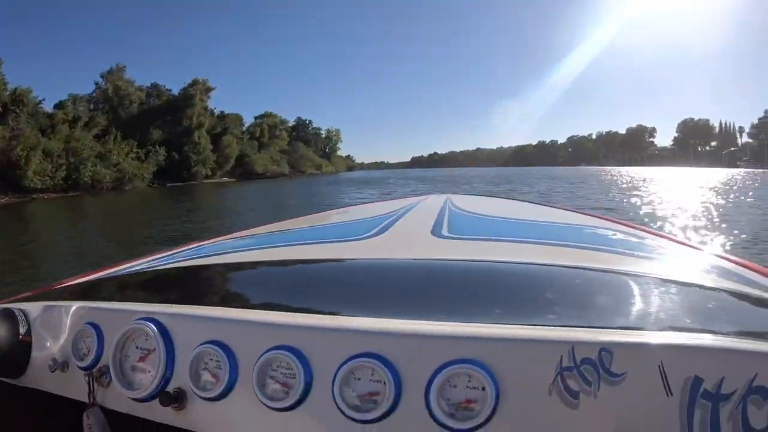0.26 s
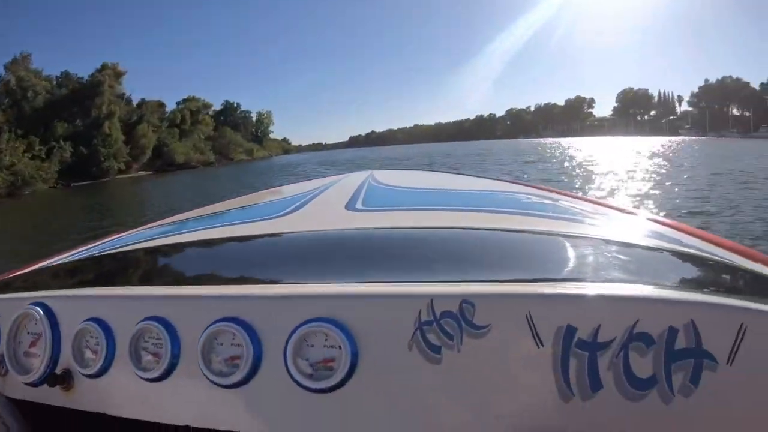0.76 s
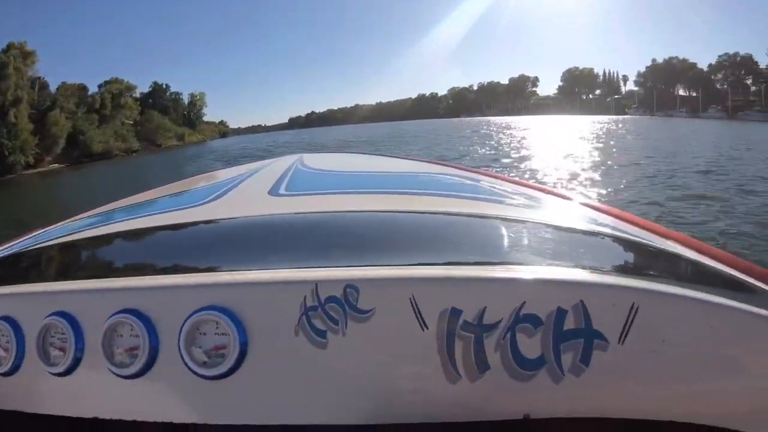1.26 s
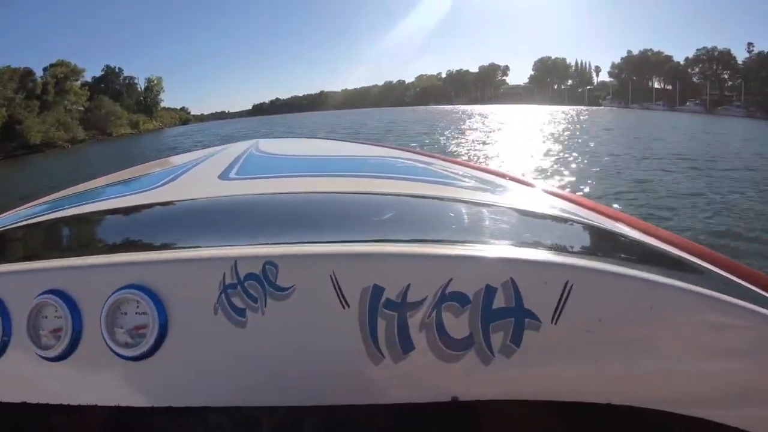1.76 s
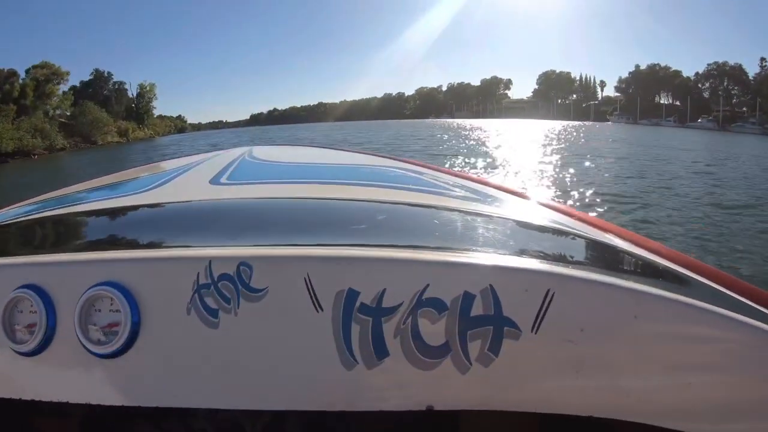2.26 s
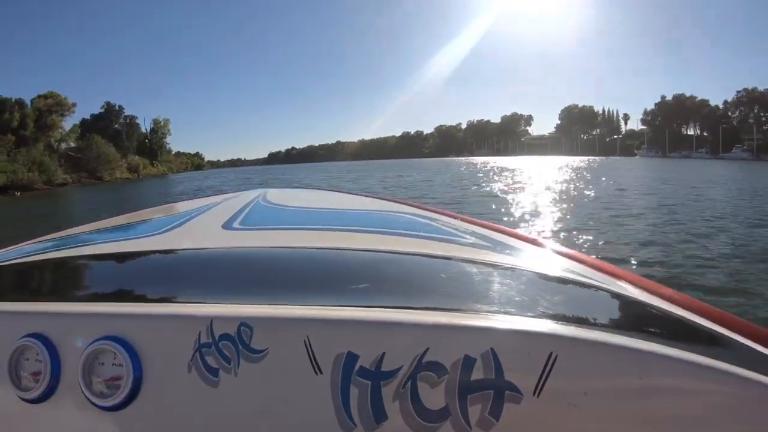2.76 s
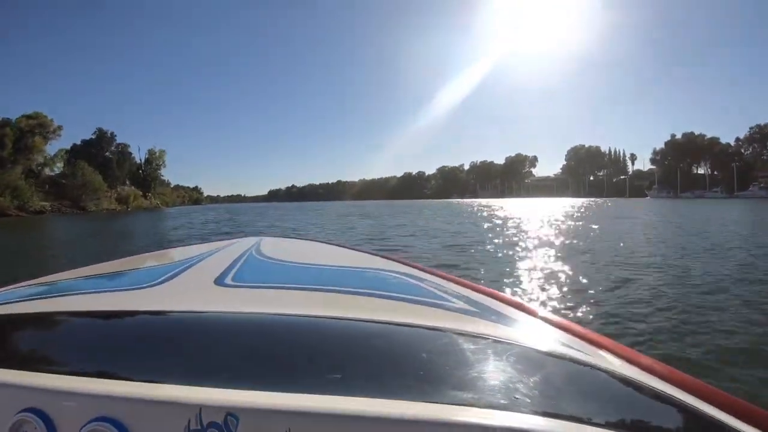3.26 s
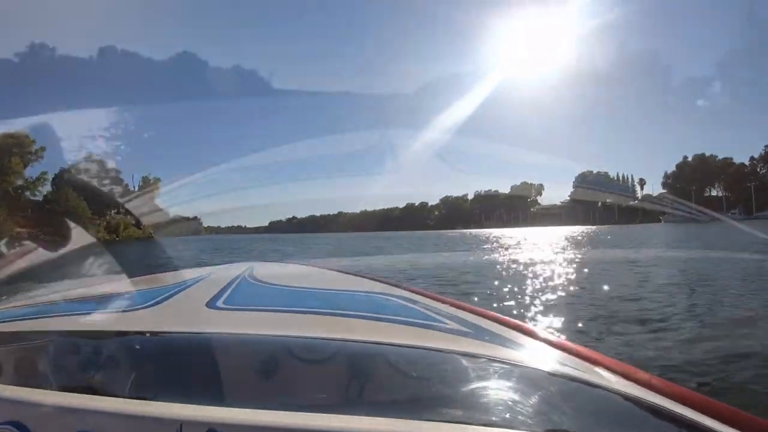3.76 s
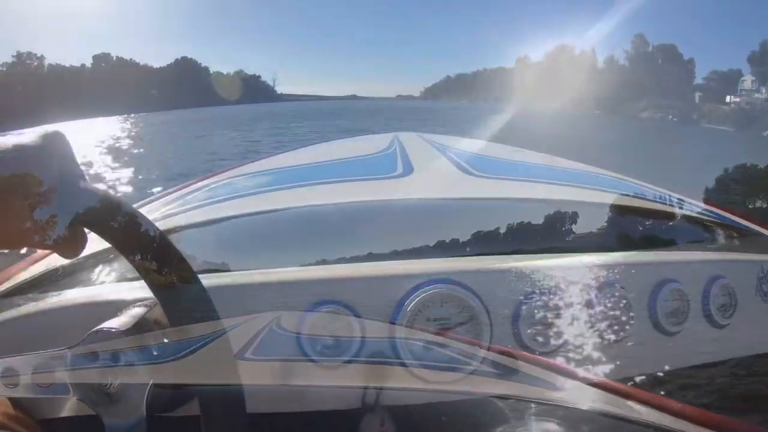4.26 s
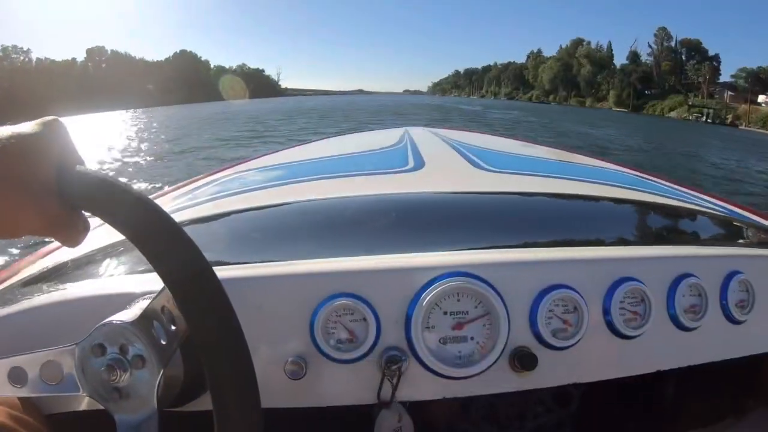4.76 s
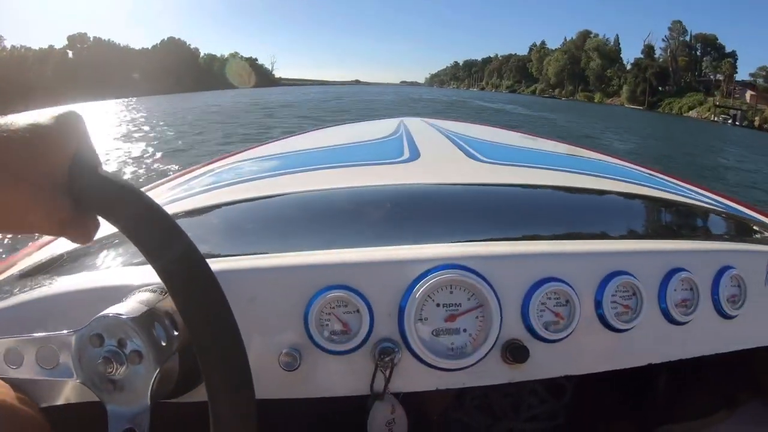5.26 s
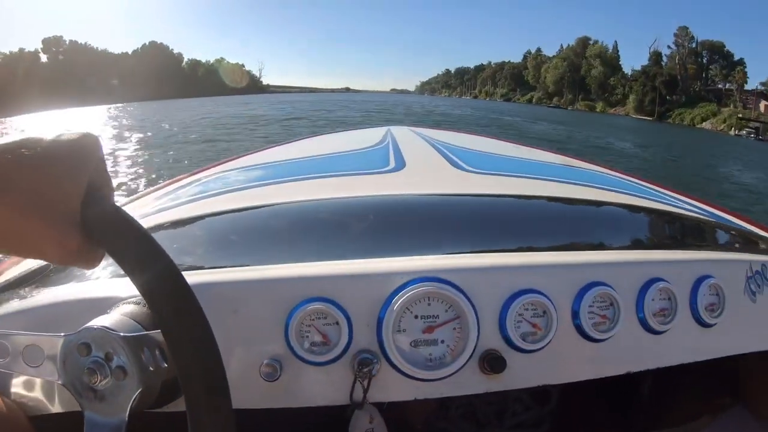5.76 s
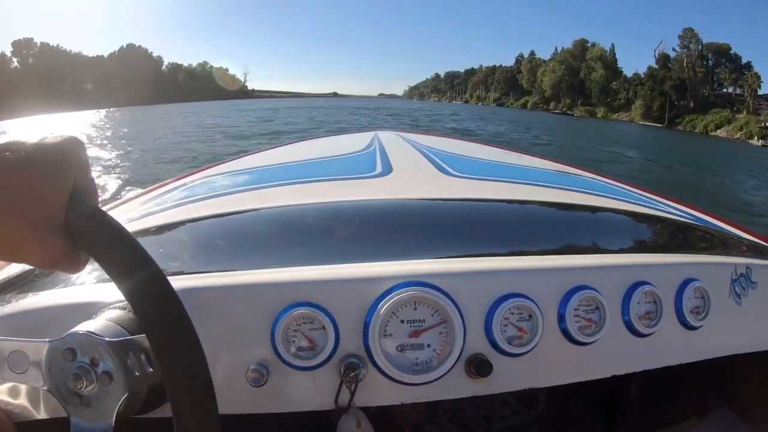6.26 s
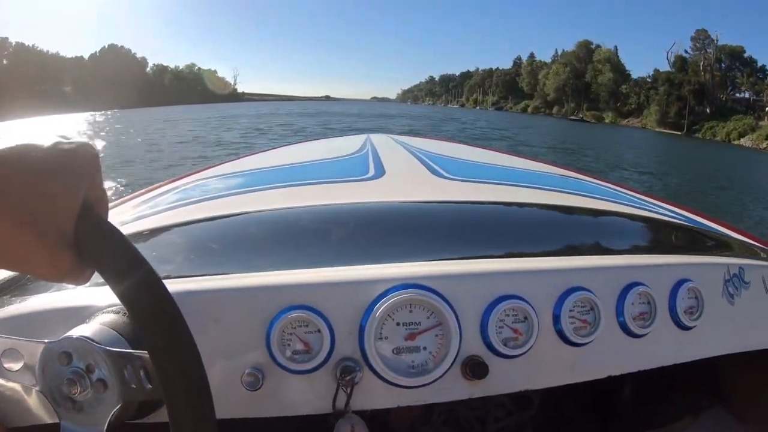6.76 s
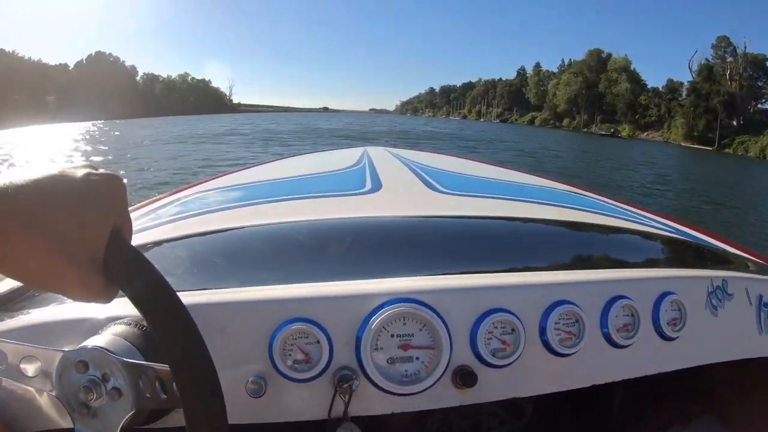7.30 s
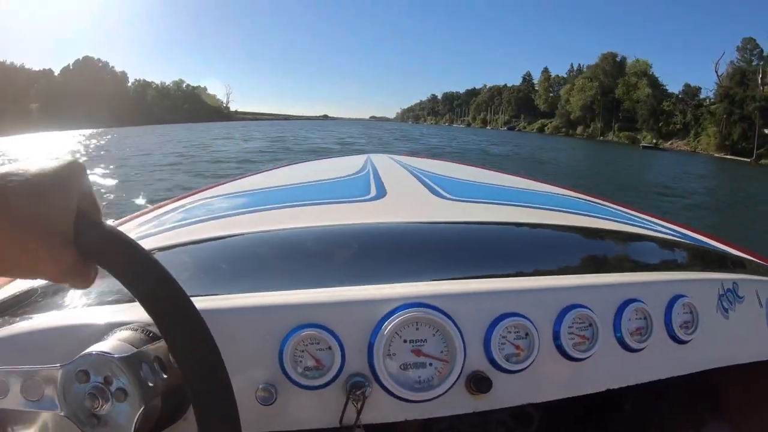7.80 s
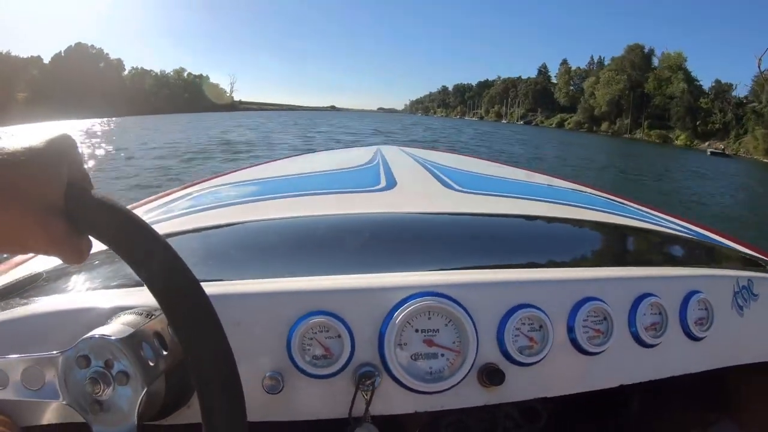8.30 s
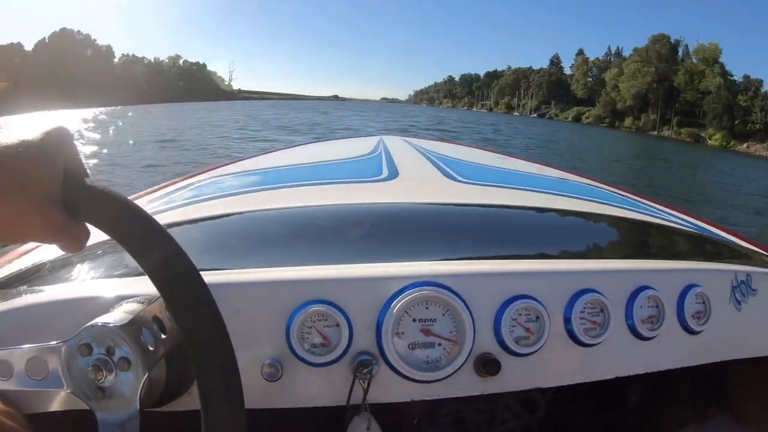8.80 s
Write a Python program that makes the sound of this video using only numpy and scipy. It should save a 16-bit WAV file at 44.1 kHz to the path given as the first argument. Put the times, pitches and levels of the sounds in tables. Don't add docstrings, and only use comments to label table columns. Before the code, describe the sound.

From an open boat cockpit, a deep V8 drone with water roar and hull slaps dissolves into a louder cruise, then the throttle opens.

```python
import sys
import numpy as np
from scipy import signal
from scipy.fft import rfft, irfft, next_fast_len
from scipy.io import wavfile
from scipy.ndimage import uniform_filter1d

SR = 44100
rng = np.random.default_rng(int(sys.argv[2]) if len(sys.argv) > 2 else 0)


def makeup_ratio(level_db):
    decades = np.asarray(level_db, float) / 20
    return 10 ** decades


def unload_audio(sound):
    columns = np.transpose(np.atleast_2d(sound))
    steps = np.round(np.clip(columns, -1, 1) * 32767)
    wavfile.write(sys.argv[1], SR, steps.astype(np.int16))


N = 398663
TIME = np.arange(N) / SR

# [multiple of the engine cycle, slow_db, cruise_db, open_db]
ENGINE_ORDERS = [(2, -40, -22, -20), (3, -35, -25, -19), (4, -27, -36, -23), (5, -13, -43, -30),
                 (6, -35, -42, -30), (7, -47, -47, -35), (8, -36, -31, -19), (9, -46, -37, -32),
                 (10, -55, -47, -30), (11, -48, -28, -33), (12, -60, -51, -39), (13, -45, -30, -33),
                 (14, -39, -39, -36), (16, -56, -46, -38), (19, -60, -51, -32), (20, -61, -49, -42),
                 (21, -52, -58, -40), (22, -64, -57, -41), (23, -55, -50, -41), (24, -41, -45, -44),
                 (25, -54, -46, -49), (26, -50, -42, -43), (27, -57, -56, -38), (28, -51, -52, -45),
                 (29, -53, -46, -46), (30, -55, -58, -43), (33, -68, -56, -49), (37, -68, -60, -50),
                 (42, -55, -60, -56), (45, -54, -62, -58)]


def slow_engine():
    # [time_s, cycles_per_s]
    speed = [(0.0, 25.9), (0.09, 26.1), (1.61, 26.2), (2.04, 26.1), (3.98, 26.3), (4.6, 26.4)]
    # [time_s, level_db]
    boom = [(0.0, -11), (.36, -15), (1.3, -11.5), (1.95, -13), (2.18, -11), (2.43, -13), (2.9, -12),
            (3.7, -11.5), (4.3, -21.5), (4.6, -36)]
    turns = np.cumsum(columns(speed, TIME)[0]) / SR
    fade = 1 - dissolve(TIME)
    multiples, slow_db = np.transpose(ENGINE_ORDERS)[:2]
    levels_db = slow_db[:, None] + 0.5 + 20 * np.log10(fade + 1e-3)
    levels_db[np.round(multiples) == 5] = columns(boom, TIME)[0]

    beats_per_s, beat_peak_s, beat_depth = 1.95, 2.44, 0.68
    second_bank = np.exp(2j * np.pi * beats_per_s * (TIME - beat_peak_s))
    banks = abs(1 + beat_depth * (1 - turned_in()) * second_bank)
    settle_s, settle_rise_s, unsettled_db = 1.5, 0.58, -3.5
    firing_db = -34 + 20 * np.log10(banks) + unsettled_db * (1 - ramp(settle_s, settle_rise_s))
    levels_db[np.round(multiples) == 8] = firing_db + 10 * np.log10(fade + 1e-3)
    levels_db[multiples > 6] += 8.0 * turned_in()

    tones = orders(turns, levels_db, waver_db=2.0, slip=0.05) + fade * pump_whine(turns)
    return (tones + fade * valve_gear(turns)) * np.minimum(10 * fade, 1)


def pump_whine(turns):
    pump_order, pump_db = 52.65, -50
    level = makeup_ratio(pump_db + 2 * wander(4.0)[0])
    return level * np.cos(2 * np.pi * pump_order * turns + wander(6.0)[0])


def valve_gear(turns):
    # [place in the engine cycle 0-1, level_db]
    closings = [
        (.2, -5),
        (.31, 0),
        (.56, -4),
        (.81, -12),
        (.93, -3),
    ]
    # [pitch_hz, db_per_hz]
    tick_colour = [(2000, -60), (3800, -22), (4600, -4), (5300, 0), (6300, -6), (7200, -22), (9500, -70)]
    clicks = np.zeros(N)
    for place, db in closings:
        at = np.flatnonzero(np.diff(np.floor(turns - place))) + 1
        clicks[at] += makeup_ratio(db + 3.0 * rng.standard_normal(N // 1000)[:len(at)])
    t = np.arange(400) / SR
    decay_60db_s, rise_s = 0.008, 0.00065
    tick = makeup_ratio(-60 * t / decay_60db_s) * np.minimum(t / rise_s, 1)
    burst = signal.oaconvolve(clicks, tick)[:N]
    gear_db, swing_db, peak_s, period_s = -55, 3.5, 1, 2.05
    level_db = gear_db + swing_db * np.cos(2 * np.pi * (TIME - peak_s) / period_s)
    return makeup_ratio(level_db) * evened(coloured(burst * rng.standard_normal(N), tick_colour))


def fast_engine():
    # [time_s, cycles_per_s]
    speed = [(4.4, 29.4), (5.2, 29.6), (5.7, 29.5), (6.3, 29.65), (6.6, 29.55), (6.92, 29.8), (6.98, 30.5),
             (7.12, 34.0), (7.16, 34.6), (7.25, 35.1), (7.4, 36.7), (7.5, 37.15), (7.75, 36.9),
             (7.86, 36.45), (8.03, 36.9), (8.48, 37.1), (9.04, 36.9)]
    cruise_end_hz, full_open_hz = 29.8, 33.5
    hz = columns(speed, TIME)[0] + 0.04 * wander(5.73)[0]
    multiples, _, cruise_db, open_db = np.transpose(ENGINE_ORDERS)
    throttle = np.clip((hz - cruise_end_hz) / (full_open_hz - cruise_end_hz), 0, 1)

    push_s, rise_s, hold_s, release_s = 6.85, 0.26, 0.13, 0.18
    pushed = ramp(push_s, rise_s)
    straining = pushed - ramp(push_s + rise_s + hold_s, release_s)
    load_db, strain_db = -0.5, 2.0
    levels_db = np.outer(cruise_db, 1 - throttle) + np.outer(open_db, throttle)
    levels_db += load_db + strain_db * straining

    creep_s, creep_rise_s, from_db, to_db = 4.6, 2.0, -2.5, 3.0
    creep_db = (from_db + (to_db - from_db) * ramp(creep_s, creep_rise_s)) * (1 - throttle)
    levels_db[multiples > 4] += creep_db
    rasp_db, rasp_push_db = 1.5, 1.5
    levels_db[multiples > 19] += rasp_db + rasp_push_db * straining

    firing_cruise_db, firing_open_db, overshoot_db = -30, -18.5, 7
    firing_db = firing_cruise_db + (firing_open_db - firing_cruise_db) * pushed
    levels_db[np.round(multiples) == 8] = firing_db + overshoot_db * straining + creep_db
    return dissolve(TIME) * orders(np.cumsum(hz) / SR, levels_db, waver_db=1.4, slip=0.04)


def orders(turns, levels_db, waver_db, slip):
    multiples = np.round(np.transpose(ENGINE_ORDERS)[0])
    sway = wander(4.0, count=len(multiples))
    drift = wander(4.0, count=len(multiples))
    phase = 2 * np.pi * (multiples[:, None] * turns + rng.random((len(multiples), 1)))
    phase = phase + slip * np.sqrt(multiples)[:, None] * drift
    unsteady = np.minimum(1, makeup_ratio(-0.5 * (levels_db + 30)))
    unsteady = unsteady + 0.3 * (multiples < 4)[:, None]
    tones = makeup_ratio(levels_db + waver_db * unsteady * sway) * np.cos(phase)
    return np.sqrt(2) * tones.sum(0)


def water_and_wind():
    # [low_hz, high_hz]
    bands = [
        (18, 50),
        (760, 1300),
        (1400, 3400),
        (3700, 6800),
        (7400, 9500),
    ]
    # [time_s, buffet_db]
    gusts = [(0.0, -43.5), (.15, -27), (.85, -31.5), (1.3, -32), (1.5, -36.5), (2.1, -32.5), (2.5, -35),
             (3.6, -35), (4.4, -34.5), (6.1, -28.5), (6.5, -29.5), (6.65, -29), (7.4, -33.5), (7.88, -28.5),
             (8.06, -34), (8.69, -29), (9.04, -35.5)]
    # [pitch_hz, db_per_hz]
    wind_colours = [
        [(8, -26), (18, -13), (35, -4.5), (60, 5), (110, 6.5), (170, -8.5), (260, -12), (400, -39.5), (900, -95.5)],
        [(8, -30.5), (18, -9.5), (35, -10.5), (60, 2.5), (110, 4), (170, -9.5), (260, -9), (400, -35.5), (900, -93)],
    ]
    roar_colours = [
        [(100, -30.5), (170, -7), (184, -6), (279, -16), (360, -12), (493, -18.5), (631, -16.5), (1300, -27), (1690, -60.5), (2860, -120)],
        [(100, -40.5), (170, 2), (193, -2), (314, -1), (527, -9.5), (748, -10), (1040, -10.5), (1300, -19.5), (1690, -43.5), (2860, -120)],
    ]
    hiss_colours = [
        [(400, -74.5), (800, -24), (1250, -2), (1900, -4), (2600, -8), (3100, -11.5), (3600, -19), (4500, -44.5), (6000, -93.5)],
        [(400, -69.5), (800, -17.5), (1250, -2), (1900, -5), (2600, -12), (3100, -19.5), (3600, -22.5), (4500, -44), (6000, -94.5)],
    ]
    spray_colours = [
        [(1800, -73), (2900, -25), (3500, 2.5), (4000, 3.5), (4700, -2.5), (6400, -6.5), (6900, -4.5), (7500, -27), (9500, -90)],
        [(1800, -68.5), (2900, -28.5), (3500, -9.5), (4100, 2.5), (4600, 1.5), (6400, -3), (6900, -13.5), (7500, -28.5), (9500, -95.5)],
    ]
    mist_colours = [
        [(4000, -60), (6000, -23), (6900, -3.5), (8300, -5.5), (9500, -18.5), (10800, -27), (12000, -31.5), (15500, -37.5), (17000, -73.5)],
        [(4000, -54.5), (6000, -8.5), (6900, -6), (8300, -10), (9500, -22.5), (10800, -35.5), (12000, -42), (15500, -48), (17000, -70.5)],
    ]
    roar_db, hiss_db, spray_db, mist_db = water_levels()
    wind_db = columns(gusts, TIME)[0] - 1.0
    wind = rushing(wind_colours, bands[0], wind_db, size=2048, patchy_db=1.2, flicker_db=1.2)
    roar = rushing(roar_colours, bands[1], roar_db - 1.0, size=1024, patchy_db=0.0, flicker_db=1.15)
    hiss = rushing(hiss_colours, bands[2], hiss_db + 1.0, size=512, patchy_db=1.0, flicker_db=0.0)
    spray = rushing(spray_colours, bands[3], spray_db, size=256, patchy_db=2.0, flicker_db=0.5)
    mist = rushing(mist_colours, bands[4], mist_db - 1.5, size=256, patchy_db=0.8, flicker_db=0.8)
    drops = droplets(spray_db - 5.0, per_s=1000, spread_db=1.5, colour=spray_colours[1])
    return wind + roar + hiss + spray + mist + drops + grille_crackle()


def water_levels():
    # [slow_db, fast_db, share of wash, share of airborne]
    layers = [
        (-36, -28.5, 0.81, 0.054),
        (-42.5, -35, 1.15, 0.045),
        (-50.5, -42.5, .8, 0.38),
        (-63.5, -62.5, 0.56, 1.0),
    ]
    # [time_s, wash_db]
    wash = [(0.0, 1), (.17, 7.5), (.38, 3.5), (1.3, 1.5), (1.36, 6.5), (1.72, 5), (1.8, 2), (2.6, -3),
            (3.0, -0.5), (3.7, -3.5), (4.5, 1), (5.26, 2), (5.6, 1), (6.4, 0.5), (6.9, 3.5), (7.3, 0.5),
            (7.75, 0), (9.04, 0.5)]
    # [time_s, airborne_db]
    airborne = [(0.0, -2), (.98, 1.5), (1.24, 9), (1.72, 2.5), (2.49, -1.5), (3.05, 4), (4.6, -2),
                (6.3, -6), (6.6, 4.5), (6.95, 8), (7.68, 11.5), (8.28, 8), (9.04, 7)]
    slow_db, fast_db, of_wash, of_air = np.transpose(layers)[:, :, None]
    share = dissolve(TIME) ** 1.43
    base_db = 10 * np.log10((1 - share) * makeup_ratio(2 * slow_db) + share * makeup_ratio(2 * fast_db))
    chop_db = 0.53 * wander(8.0, count=4)
    return base_db + of_wash * columns(wash, TIME)[0] + of_air * columns(airborne, TIME)[0] + chop_db


def rushing(colours, band, level_db, size, patchy_db, flicker_db):
    hop = size // 4
    frames, hz = N // hop + 5, np.fft.rfftfreq(size, 1 / SR)
    t = np.arange(frames) * hop / SR
    a, b, patches = rng.standard_normal((frames, len(hz), 3)).T
    patches = uniform_filter1d(patches, size=size // 64, axis=0)
    patches = evened(uniform_filter1d(patches, size=8, axis=1))
    flicker = evened(uniform_filter1d(rng.standard_normal(frames), size=3))
    slow, fast = (read(c, hz)[:, None] for c in colours)
    shape = makeup_ratio(slow + (fast - slow) * dissolve(t))
    in_band = (hz > band[0]) & (hz < band[1])
    shape = shape / np.sqrt((shape[in_band] ** 2).sum(0))
    z = (a + 1j * b) * shape * makeup_ratio(patchy_db * patches + flicker_db * flicker)
    return makeup_ratio(level_db) * signal.istft(z, nperseg=size, noverlap=size - hop)[1][:N]


def droplets(level_db, per_s, spread_db, colour):
    size = makeup_ratio(spread_db * np.minimum(rng.exponential(1, N), 5))
    strikes = size * (rng.random(N) < per_s / SR)
    burst = signal.oaconvolve(strikes, signal.windows.hann(60))[:N]
    return makeup_ratio(level_db) * evened(coloured(burst * rng.standard_normal(N), colour))


def slaps():
    # [start_s, length_s, level_db]
    sheets = [(1.356, 0.049, -35), (1.406, 0.033, -30.5), (1.57, 0.089, -36), (1.952, 0.057, -35),
              (2.139, 0.018, -31.5), (6.595, 0.028, -34), (6.982, 0.058, -37), (7.57, 0.13, -36),
              (7.703, 0.076, -35), (7.868, 0.035, -30), (8.498, 0.069, -47)]
    # [pitch_hz, db_per_hz]
    slap_colour = [(150, -58), (350, -22), (600, 2), (1800, 0.5), (3200, -13), (4200, -7.5), (6500, -7),
                   (7200, -25), (9000, -53), (12000, -84)]
    noise = evened(coloured(rng.standard_normal(N), slap_colour))
    shape = np.zeros(N)
    rise_s, fall_s = 0.0016, 0.0099
    for start, length, db in sheets:
        u = TIME - start
        sheet = makeup_ratio(db - 3.5 * u.clip(0, 1) / length)
        shape += sheet * np.clip(u / rise_s, 0, 1) * np.clip((length - u) / fall_s + 1, 0, 1)
    return shape * noise


def grille_crackle():
    # [start_s, rise_s, end_s, level_db]
    patches = [
        (1.385, .01, 1.49, -69),
        (1.52, .02, 1.7, -75),
        (7.93, .01, 7.96, -77),
        (8.48, .02, 8.55, -73),
    ]
    # [pitch_hz, db_per_hz]
    crackle_colour = [(7000, -60), (9500, -14), (11600, -4), (13000, 0), (15500, -4), (17000, -60)]
    shape = np.zeros(N)
    for start, rise, end, db in patches:
        shape += makeup_ratio(db) * np.clip((TIME - start) / rise, 0, 1) * np.clip((end - TIME) / rise, 0, 1)
    return shape * droplets(0, per_s=200, spread_db=3.0, colour=crackle_colour)


def puff():
    # [pitch_hz, db_per_hz]
    puff_colour = [(9000, -60), (11300, -22), (11800, -4), (12800, 0), (14200, -7), (15500, -22),
                   (17000, -60)]
    centre_s, half_width_s = 4.1, 0.2
    swell = np.exp(-0.5 * ((TIME - centre_s) / half_width_s) ** 2)
    return swell * droplets(-72, per_s=2500, spread_db=1.5, colour=puff_colour)


def hollow():
    # [pitch_hz, width_hz, level_db]
    bays = [
        (365, 60, -29),
        (640, 90, -39),
    ]
    drone = np.zeros(N)
    for hz, width, db in bays:
        b, a = signal.iirpeak(hz, hz / width, fs=SR)
        once = signal.lfilter(b, a, rng.standard_normal(N))
        drone += makeup_ratio(db) * evened(signal.lfilter(b, a, once))
    return drone * turned_in()


def turned_in():
    return ramp(3.12, 0.29) * (1 - ramp(3.85, 0.22))


def shaded(x):
    # [pitch_hz, width_hz, share removed turned in, share removed at the start]
    shades = [
        (480, 87, 0.67, 0.0),
        (3300, 2200, 0.46, .6),
    ]
    leave_s, leave_fall_s = 0.32, 0.5
    for hz, width, share, first in shades:
        depth = np.clip(share * turned_in() + first * (1 - ramp(leave_s, leave_fall_s)), 0, 1)
        x = x - depth * signal.lfilter(*signal.iirpeak(hz, hz / width, fs=SR), x)
    return x


def dissolve(t):
    # [start_s, end_s]
    span = (3.24, 4.58)
    return np.clip((t - span[0]) / (span[1] - span[0]), 0, 1)


def ramp(start, rise):
    return np.clip((TIME - start) / rise, 0, 1)


def wander(hz, count=1):
    coarse = rng.standard_normal((count, N // 441 + 2))
    coarse = uniform_filter1d(coarse, max(round(50 / hz), 1), mode="wrap")
    return np.array([np.interp(TIME, np.arange(len(c)) / 100, evened(c)) for c in coarse])


def evened(x):
    return x / np.sqrt(np.mean(x ** 2) + 1e-20)


def columns(rows, t):
    s, *values = np.transpose(rows)
    return [np.interp(t, s, v) for v in values]


def read(points, hz):
    f, value = np.transpose(points)
    return np.interp(np.log(hz + 1), np.log(f + 1), value)


def coloured(x, points):
    size = next_fast_len(len(x))
    gain = makeup_ratio(read(points, np.fft.rfftfreq(size, 1 / SR)))
    return irfft(rfft(x, size) * gain, size)[:len(x)]


def scene():
    engine = slow_engine() + fast_engine()
    water = shaded(water_and_wind() + hollow())
    return (engine + water + slaps() + puff())[None]


def low_pass(x):
    return signal.sosfilt(signal.butter(12, 15720, fs=SR, output="sos"), x)


def record(dry):
    ceiling = 1.1
    mix = ceiling * np.tanh(dry / ceiling)
    return low_pass(mix)


dry = scene()
out = record(dry)
unload_audio(out)
```